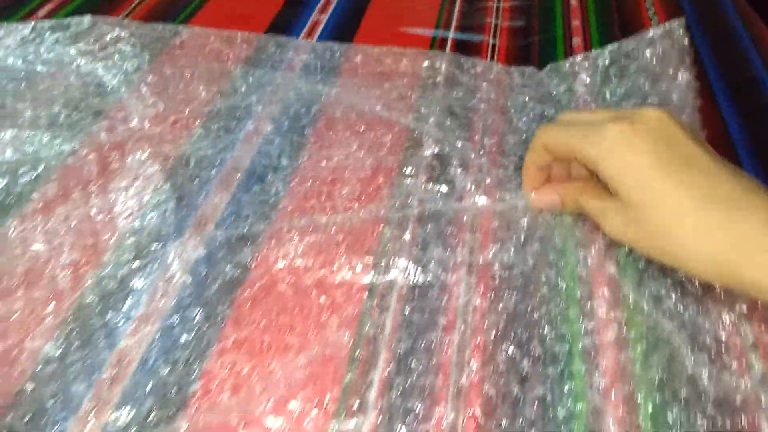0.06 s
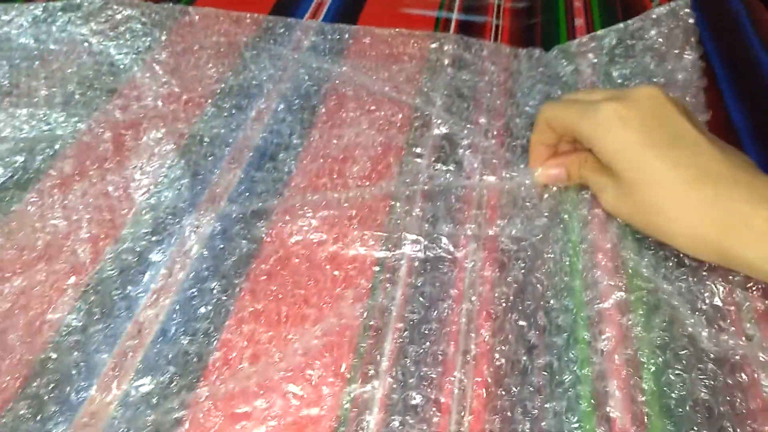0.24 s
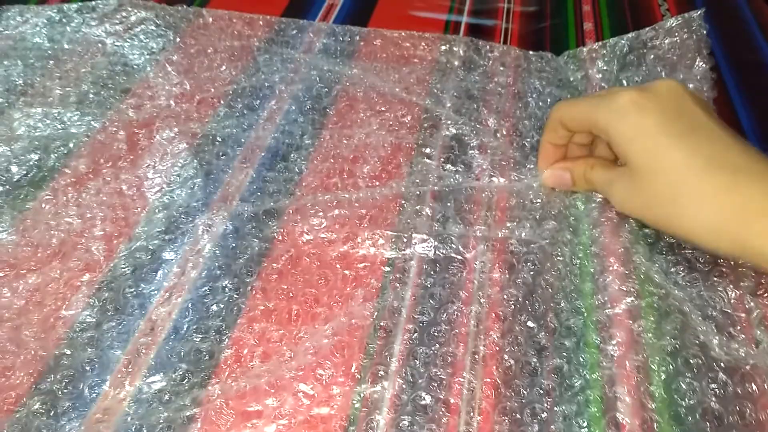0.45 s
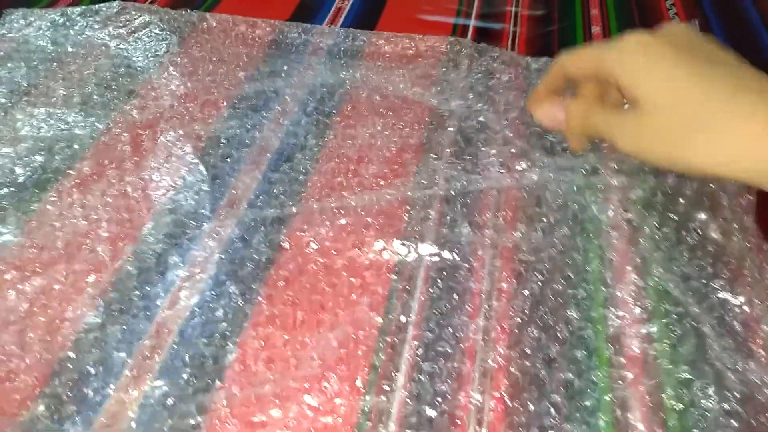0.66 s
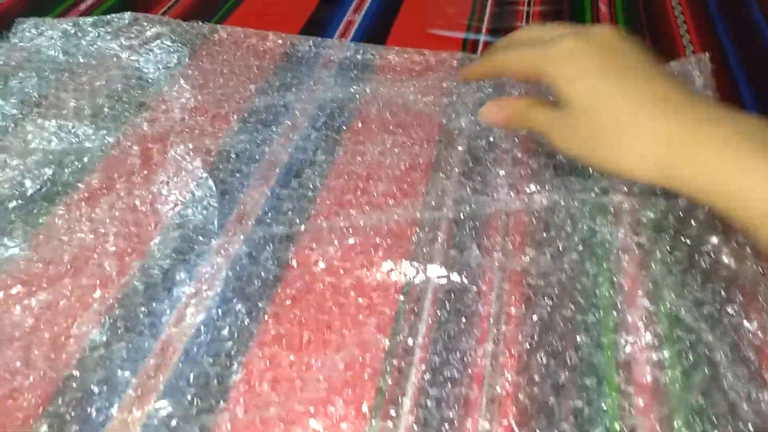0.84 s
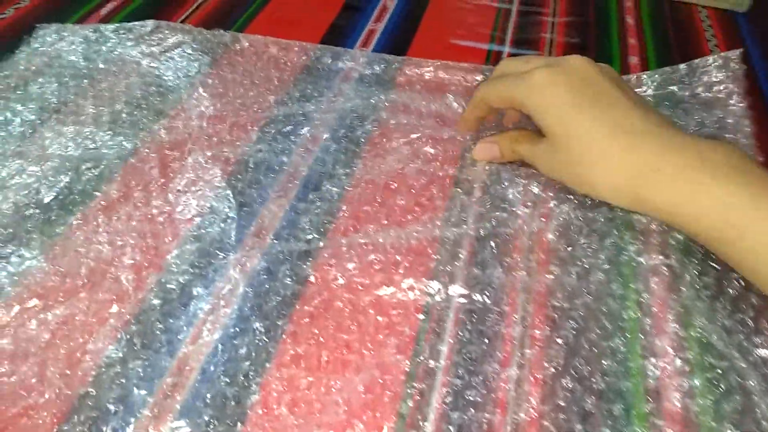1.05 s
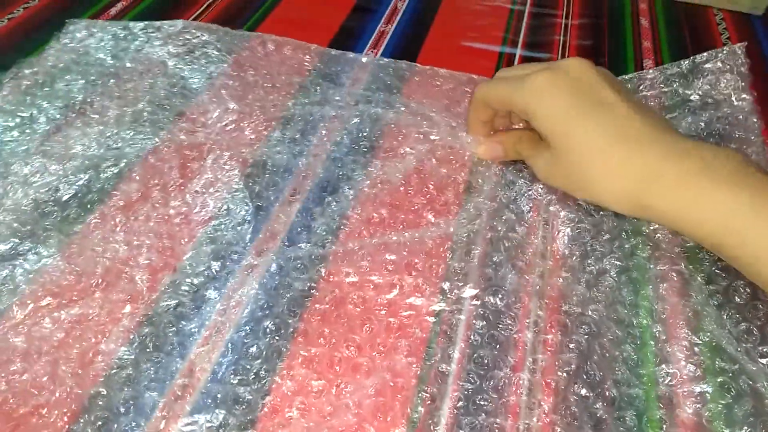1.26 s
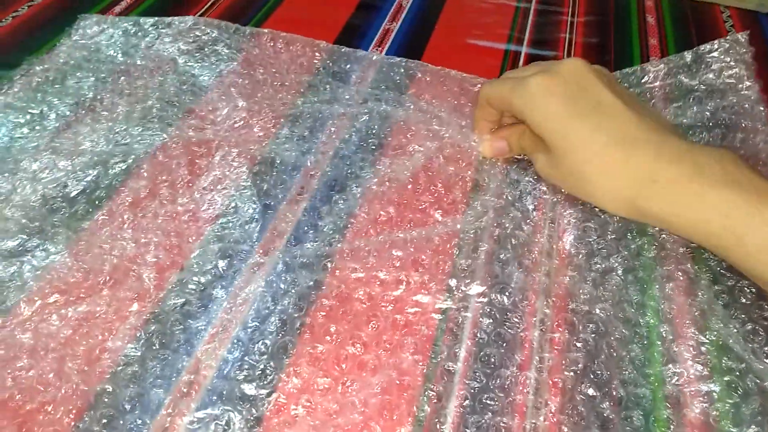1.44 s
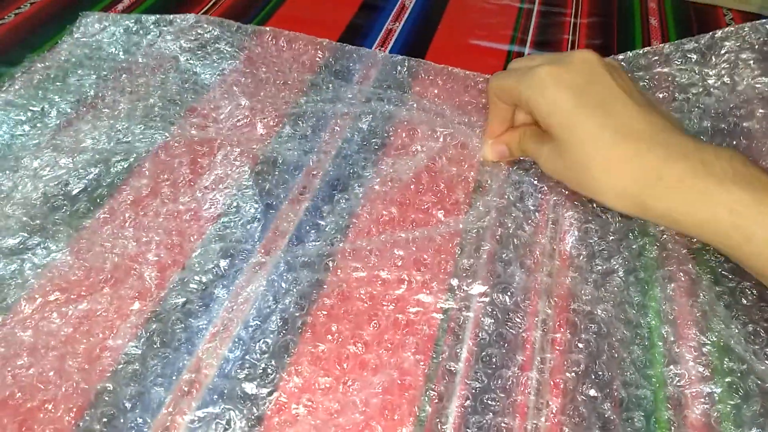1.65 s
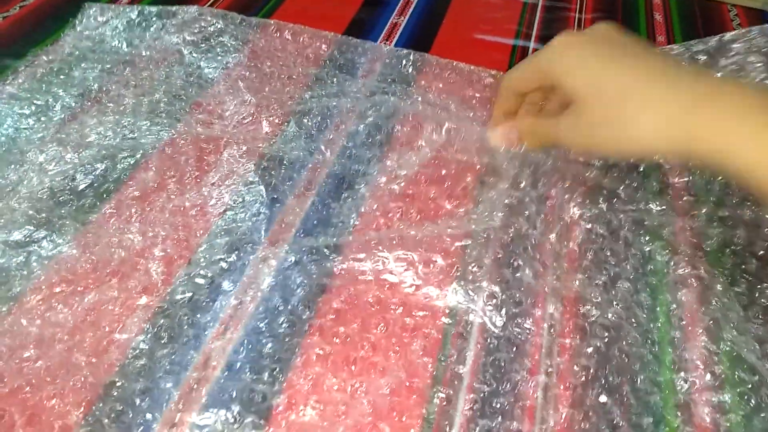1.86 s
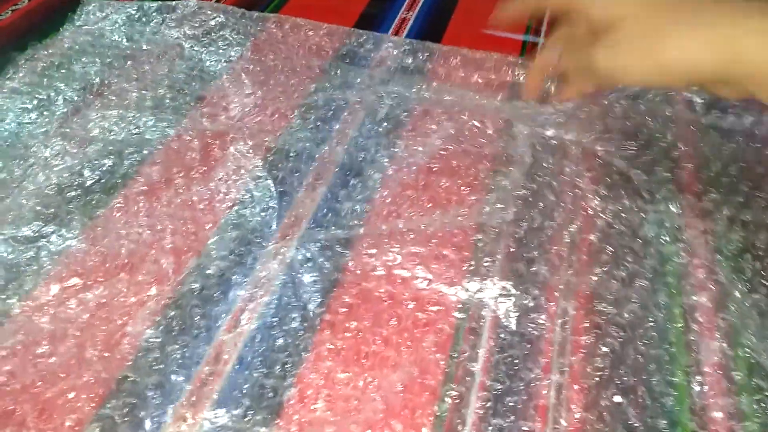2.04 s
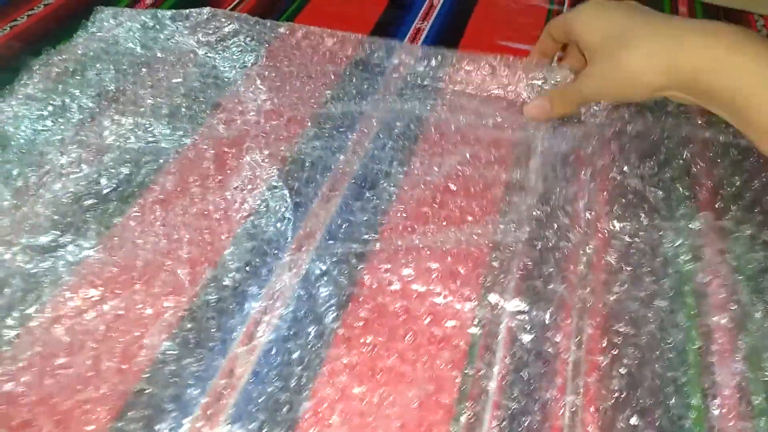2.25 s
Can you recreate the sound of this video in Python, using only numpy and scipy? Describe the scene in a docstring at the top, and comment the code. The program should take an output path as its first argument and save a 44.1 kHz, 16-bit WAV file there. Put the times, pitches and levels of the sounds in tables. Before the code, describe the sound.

Bubble wrap pops three times, the first loudest, with light plastic rustling between.

```python
"""Fingers burst three bubbles of bubble wrap: the film rips and snaps, and the trapped air puffs out.
The sheet lies on a cloth-covered table in a small, echoing room. Between pops it rustles and ticks,
and a faint whistle passes. At the end the hand knocks twice on the table and drags the sheet.
A camera close by widens the stereo, overloads on the first pop and turns its gain down after it."""
import sys
import numpy as np
from scipy import signal
from scipy.fft import rfft, irfft
from scipy.io import wavfile
from scipy.ndimage import uniform_filter1d

SR = 44100
rng = np.random.default_rng(int(sys.argv[2]) if len(sys.argv) > 2 else 0)


def unload_audio(sound):
    """Save the sound as a 16-bit wav file, at the path given as the first command line argument."""
    columns = np.transpose(np.atleast_2d(sound))
    # keep every value between -1 and 1, then stretch to whole-number steps
    steps = np.round(np.clip(columns, -1, 1) * 32767)
    wavfile.write(sys.argv[1], SR, steps.astype(np.int16))


N = 101429
T = np.arange(N) / SR
HZ = np.fft.rfftfreq(2 * N, 1 / SR)

# Tone of the room's air, its echo, the dragged sheet and the rustling film.
# Each row: frequency in Hz, relative level in dB.
AIR_TONE = [(20, -9), (60, -9), (150, -0.5), (300, -6), (700, -12.5), (1500, -15.5), (4000, -20),
            (9000, -19.5), (15000, -23)]
ROOM_TONE = [(100, 4.5), (500, -1), (1300, -5.5), (2500, 3), (4000, 0.5), (5500, -4), (7000, -3.5),
             (10000, -4), (15000, -0.5)]
DRAG_TONE = [(30, -13.5), (70, -8.5), (140, 3), (250, -1.5), (420, -3.5), (700, -17), (1200, -11),
             (2200, -25), (6000, -44.5)]
FILM_TONE = [(100, -21.5), (400, -12.5), (800, -4.5), (1300, 2), (2200, -3.5), (3400, 0.5), (4800, -4),
             (7000, -2.5), (9200, -1), (11500, -9), (15000, -6)]
# The room's echo. Each row: frequency in Hz, seconds to fade by 60 dB.
ROOM_FADE = [(100, 0.32), (400, .42), (1300, .52), (3500, .55), (8000, .56), (15000, 0.46)]
# One curve for each move of the hand. Each point: time in seconds, level in dB.
DRAG_CURVES = [
    [(0, -47.5), (.05, -48.5), (.095, -53.5), (.105, -70)],
    [(1.29, -64), (1.4, -72.5), (1.54, -68), (1.57, -80)],
    [(1.85, -77), (1.93, -65), (2.03, -79)],
    [(2.175, -56), (2.235, -51), (2.3, -55.5)],
]
RUSTLE_CURVES = [
    [(0, -42), (.06, -45.5), (.095, -41), (.105, -35)],
    [(.36, -67.5), (.46, -61), (.53, -54), (.585, -50), (.61, -71.5), (.7, -73), (.86, -70)],
    [(.86, -72), (.915, -52), (.95, -60.5), (1.01, -61), (1.04, -58), (1.11, -57.5), (1.2, -62),
     (1.29, -59.5)],
    [(1.3, -58), (1.4, -60.5), (1.48, -62), (1.52, -51), (1.56, -76), (1.63, -74)],
    [(1.7, -66.5), (1.78, -55.5), (1.86, -58), (1.92, -53), (1.97, -62), (2.04, -54.5), (2.07, -71.5),
     (2.16, -76)],
    [(2.17, -64.5), (2.21, -59.5), (2.245, -52), (2.3, -52)],
]
# Creases flipping. Each row: start in seconds, level in dB, pitch in Hz, width in Hz.
CREASES = [(0.005, -13.5, 3990, 3960), (0.065, -18, 7970, 6990), (0.221, -16.5, 10000, 25200),
           (0.54, -29.5, 2500, 3020), (1.147, -28.5, 5000, 6026), (1.518, -18, 9300, 14000),
           (1.779, -19, 3920, 3510), (1.88, -23.5, 2500, 2000), (1.935, -17.5, 1097, 1100)]
# How the table rings. Each row: pitch in Hz, width in Hz, level in dB.
TABLE_RINGS = [(123, 85, -1.5), (304, 270, 4), (1233, 210, -16)]
# The hand on the table. Each row: start in seconds, thud level in dB, nail click level in dB.
HAND_KNOCKS = [(2.1733, -1, -17), (2.227, -2, -23)]
# Bursting bubbles. Each row: start in seconds, puff level in dB and pitch in Hz, snap level in dB,
# pitch and width in Hz, the same three for the rip, smear in seconds, then table echo, finger thud,
# left over right and room echo, all in dB.
BUBBLES = [(0.0979, 15, 1300, 11, 5870, 2945, 13.5, 11000, 5006, .0007, -38, -29.5, 1, -12.5),
           (1.2969, 3, 1380, 1.5, 4350, 2720, -18, 10040, 1480, 0.000816, -7.5, -8, 3, 2),
           (1.5492, -1.5, 1155, -2, 6700, 4430, -3, 13240, 5050, 0.00016, -19, -23, 8.5, -13)]
# Tone of each microphone, and how much of the other side is taken away to widen the stereo.
# Each row: frequency in Hz, gain in dB.
LEFT_MIC = [(100, -0.5), (1400, 0.5), (2500, -1.5), (5000, -.5), (8200, -1), (10000, -0.5), (12000, -13),
            (15000, -12)]
RIGHT_MIC = [(100, 2.5), (1400, 1.5), (2500, -.5), (5000, 0), (8200, -3), (10000, 0), (12000, -0.5),
             (15000, -0.5)]
WIDENING = [(100, -8), (500, -7.5), (1200, 0), (2500, -4.96), (5000, -3.06), (7500, -8), (15000, -9.5)]

CRUNCH_S = .00079  # fade time of a tick or nail click


def amp(db):
    """Turns decibels into a gain."""
    return 10 ** (np.asarray(db) / 20)


def evened(x):
    """Scales a sound to an average power of 1."""
    return x / np.sqrt(np.mean(x ** 2) + 1e-20)


def read(points, hz=HZ):
    """Looks up a table on a log-frequency axis."""
    f, value = np.transpose(points)
    return np.interp(np.log(hz + 1), np.log(f), value)


def level(curves):
    """Gain over time from several level curves, silent between them."""
    return sum(amp(np.interp(T, *np.transpose(c), left=-150, right=-150)) for c in curves)


def filtered(x, response):
    """Applies a response: a gain and a phase shift for each frequency."""
    return irfft(rfft(x, 2 * N) * response)[..., :N]


def colour(points):
    """Response with a table's tone that never rings ahead of the sound."""
    log_gain = np.log(amp(read(points, np.abs(np.fft.fftfreq(2 * N, 1 / SR)))))
    return np.exp(np.conj(signal.hilbert(log_gain)))[:N + 1]


def delay(s):
    """Response that makes a sound s seconds late."""
    return np.exp(-2j * np.pi * HZ * s)


def ring(hz, width):
    """Response that rings at one pitch; a wider one dies sooner."""
    return 1j * HZ * width / (hz ** 2 - HZ ** 2 + 1j * HZ * width)


def fizz(fade_s):
    """Response of a tiny dying burst of noise."""
    burst = rng.standard_normal(N) * np.exp(-T / fade_s)
    return rfft(evened(burst), 2 * N) / np.sqrt(N)


def strike(start, response):
    """One blow with this response, at a start time in seconds."""
    top_cut = 1 + (HZ / (.42 * SR)) ** 60
    return irfft(response * delay(round(start * SR) / SR) / top_cut)[:N]


def diffuse(pair, mic_gap_s=.00053):
    """Sound from all sides: the two microphones agree only in the bass."""
    same = .82 * np.sinc(2 * HZ * mic_gap_s)
    right = filtered(pair[0], same) + filtered(pair[1], np.sqrt(1 - same ** 2))
    return np.array([pair[0], right])


def near(x, lag_s=.00003):
    """Direct sound, reaching the left microphone first."""
    return np.array([x, filtered(x, delay(lag_s))])


def wash(tone):
    """Steady noise from all sides with the given tone."""
    return evened(diffuse(filtered(rng.standard_normal((2, N)), colour(tone))))


def air():
    """The room's air makes a quiet, steady hush."""
    return amp(-68) * wash(AIR_TONE)


def room(x, onset_s=.004):
    """Many reflections blur into an echo, each band dying at its own speed."""
    hz, t, bands = signal.stft(rng.standard_normal((2, N)), SR, nperseg=256)
    fade = amp(-60 * t / read(ROOM_FADE, hz)[:, None])
    tail = signal.istft(bands * fade, SR, nperseg=256)[1][:, :N]
    tail = diffuse(tail * np.minimum(T / onset_s, 1) ** 2)
    echo = signal.fftconvolve(x[None], evened(tail) / np.sqrt(N), axes=1)[:, :N]
    return filtered(echo, colour(ROOM_TONE))


def whistle(start_s=.67, length_s=.18):
    """A faint, thin whistle comes and goes while the hand is lifted."""
    swell = np.sin(np.pi * np.clip((T - start_s) / length_s, 0, 1))
    thin_noise = evened(filtered(rng.standard_normal(N), ring(hz=9370, width=280) ** 2))
    return near(amp(-72) * swell * thin_noise)


def drag():
    """The sheet rumbles as it slides over the cloth."""
    return level(DRAG_CURVES) * wash(DRAG_TONE)


def grains(per_s, spread_db):
    """Random clicks of uneven size."""
    size = amp(spread_db * np.minimum(rng.exponential(1, (2, N)), 4))
    sign = rng.choice([-1, 1], (2, N))
    return evened(size * sign * (rng.random((2, N)) < per_s / SR))


def rustle():
    """Tiny crinkles and a few larger snaps all over the sheet, with the hiss of skin rubbing on film."""
    crinkles = grains(per_s=2700, spread_db=4.5)
    snaps = amp(-9.5) * grains(per_s=110, spread_db=3)
    rub = amp(-.5) * rng.standard_normal((2, N))
    film = evened(filtered(crinkles + snaps + rub, colour(FILM_TONE))) * level(RUSTLE_CURVES)
    return amp(-.5) * (diffuse(film) + amp(-5) * room(film[0]))


def ticks():
    """Single creases flip over with a short crunch."""
    x = sum(strike(start, amp(db) * ring(hz, width) * fizz(CRUNCH_S)) for start, db, hz, width in CREASES)
    return near(x) + amp(-7) * room(x)


def knocks():
    """A nail clicks on the film and the soft hand thuds on the padded table."""
    thud = sum(amp(db) * ring(hz, width) ** 2 for hz, width, db in TABLE_RINGS)
    nail = ring(hz=5600, width=1500) * fizz(CRUNCH_S)
    x = sum(strike(start, amp(nail_db) * nail - amp(db) * thud) for start, db, nail_db in HAND_KNOCKS)
    return near(x) + amp(-5.5) * room(x)


def smear(smear_s, fast_hz=14800):
    """Treble runs through the film faster than the middle range, which smears a crack."""
    return delay(smear_s * (1 - HZ / fast_hz / 2))


def pops():
    """Each bubble rips, its film snaps, the trapped air puffs out and the finger drops onto the table."""
    direct, to_room = np.zeros((2, N)), np.zeros(N)
    for (start, puff_db, puff_hz, snap_db, snap_hz, snap_width, rip_db, rip_hz, rip_width,
         smear_s, echo_db, thud_db, pan_db, room_db) in BUBBLES:
        snap = amp(snap_db) * ring(snap_hz, snap_width)
        rip = amp(rip_db) * ring(rip_hz, rip_width)
        film = (snap - rip) * smear(smear_s)
        puff = amp(puff_db) * ring(puff_hz, width=886)
        thud = amp(thud_db) * ring(hz=130, width=190)
        burst = puff + film + thud
        tear = amp(-3.5) * film * fizz(fade_s=.0008)
        table_echo = amp(echo_db) * film * delay(.0022)
        pan = amp([[pan_db / 2], [-pan_db / 2]])
        direct += near(strike(start, burst + tear + table_echo)) * pan
        to_room += amp(room_db) * strike(start, burst)
    return direct + room(to_room)


def widen(x, lag_s=.000403, feedback=.18):
    """Each side takes away a late, repeating copy of the other, which widens the stereo."""
    cross = amp(read(WIDENING)) * delay(lag_s)
    mid = filtered((x[0] + x[1]) / 2, (1 - cross) / (1 - feedback * cross))
    side = filtered((x[0] - x[1]) / 2, (1 + cross) / (1 + feedback * cross))
    return np.sqrt(1 + feedback) * np.array([mid + side, mid - side])


def turn_down(x, limit_db=-15.5, recover_db_per_s=11, react_s=.0011):
    """The camera lowers its gain just after a loud sound, then slowly brings it back."""
    power = abs(uniform_filter1d((x ** 2).mean(0), size=44))
    power_db = 10 * np.log10(power + 1e-12)
    recovery_db = T * recover_db_per_s
    peak_db = np.maximum.accumulate(power_db + recovery_db) - recovery_db
    over_db = np.maximum(peak_db - limit_db, 0)
    return x * amp(-np.interp(T - react_s, T, over_db))


def scene():
    """Adds up the pops, the handling sounds and the air of the room."""
    return pops() + ticks() + knocks() + rustle() + whistle() + drag() + air()


def record(dry, low_cut_hz=65, high_cut_hz=15900):
    """The camera widens and colours the sound, tames loud peaks and trims the lowest bass and top treble."""
    x = filtered(widen(dry), amp([read(LEFT_MIC), read(RIGHT_MIC)]))
    x = np.clip(turn_down(x), -1, 1)  # the first pop overloads before the gain drops
    x = signal.sosfilt(signal.butter(2, low_cut_hz, "high", fs=SR, output="sos"), x)
    treble_cut = signal.firwin(161, high_cut_hz, window=("kaiser", 8), fs=SR)
    return signal.oaconvolve(x, treble_cut[None], "same")


dry = scene()
out = record(dry)
unload_audio(out)
```